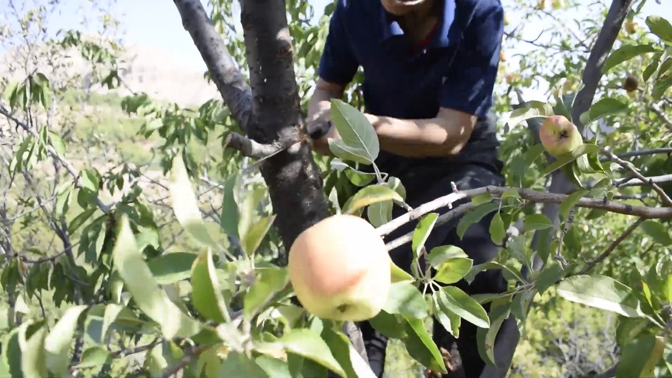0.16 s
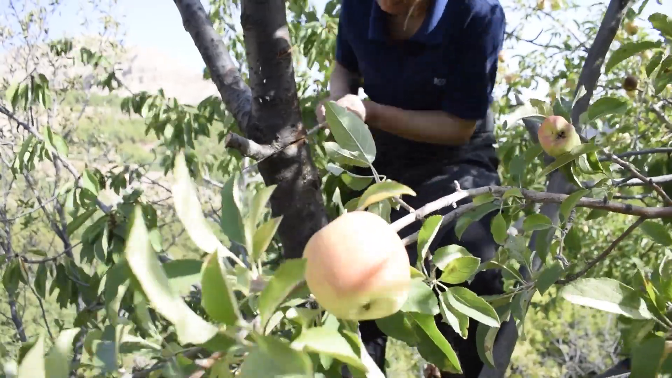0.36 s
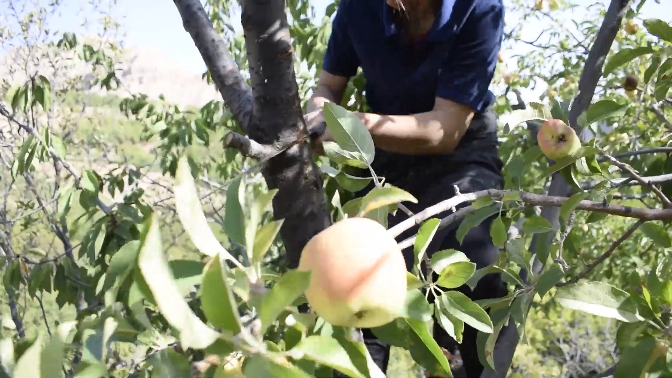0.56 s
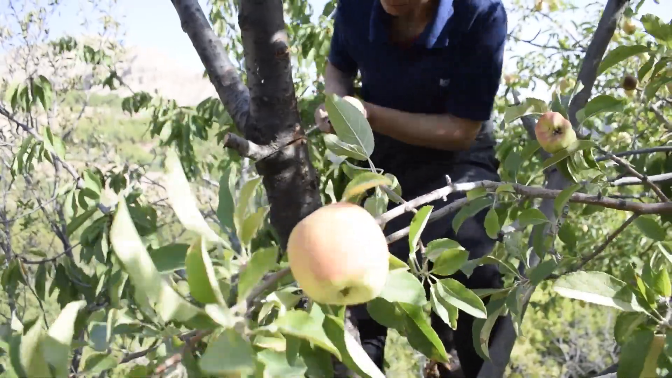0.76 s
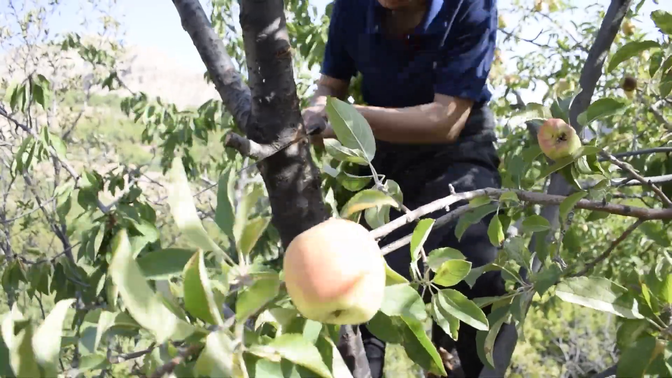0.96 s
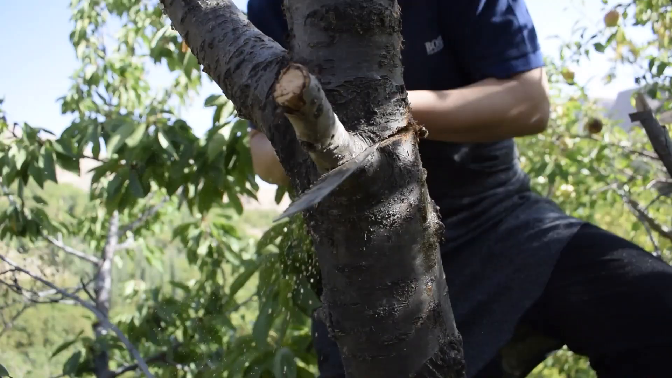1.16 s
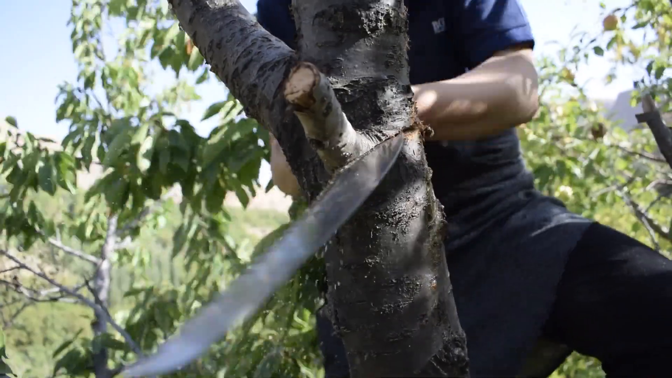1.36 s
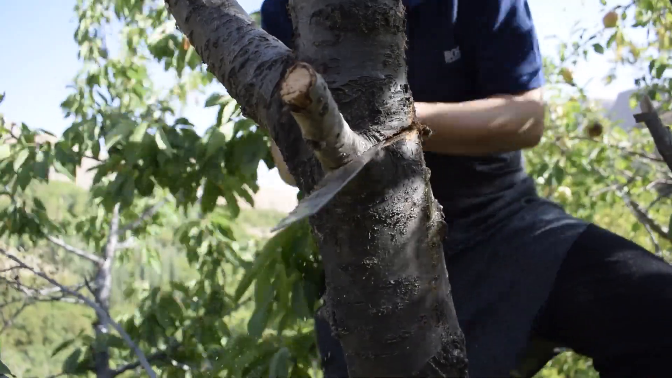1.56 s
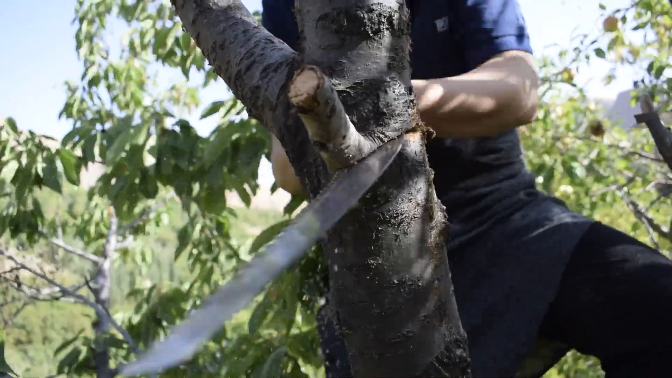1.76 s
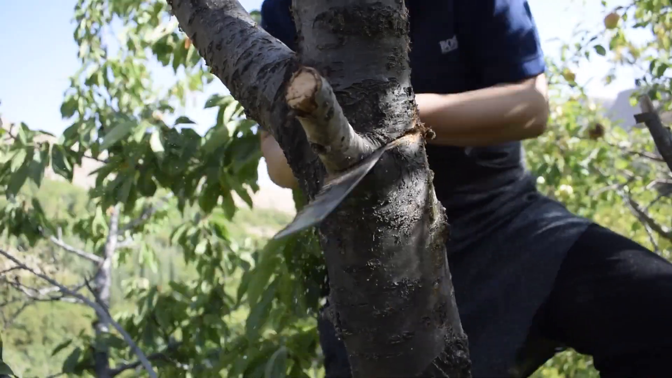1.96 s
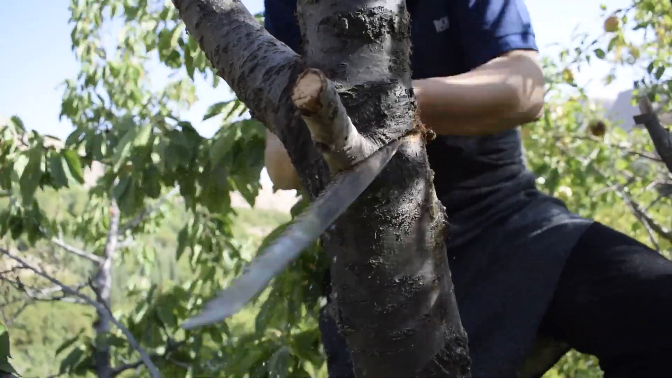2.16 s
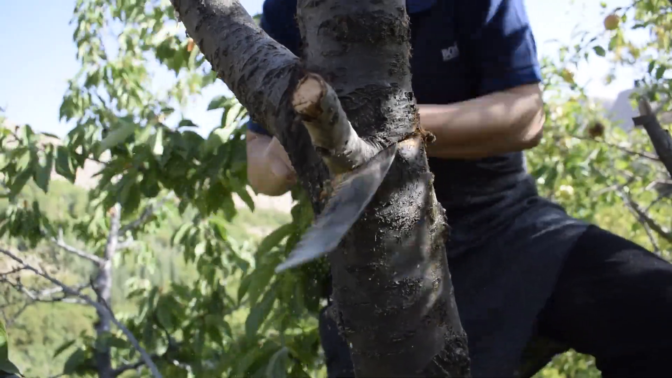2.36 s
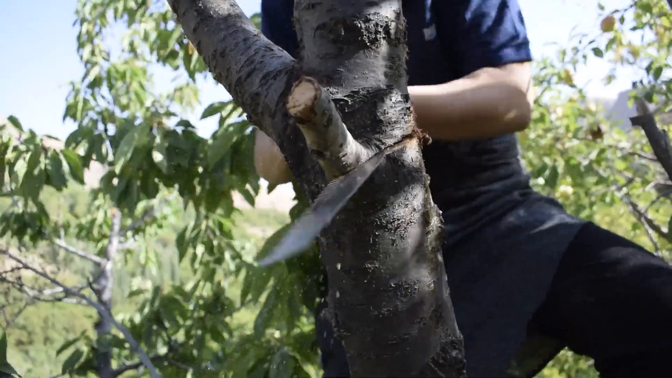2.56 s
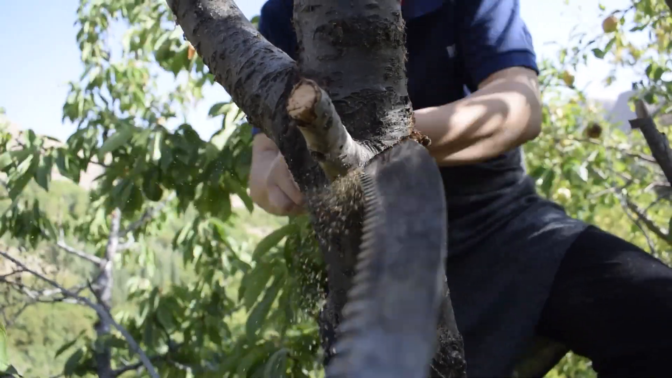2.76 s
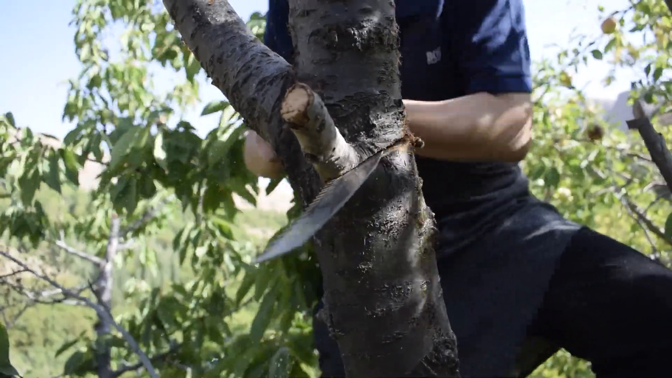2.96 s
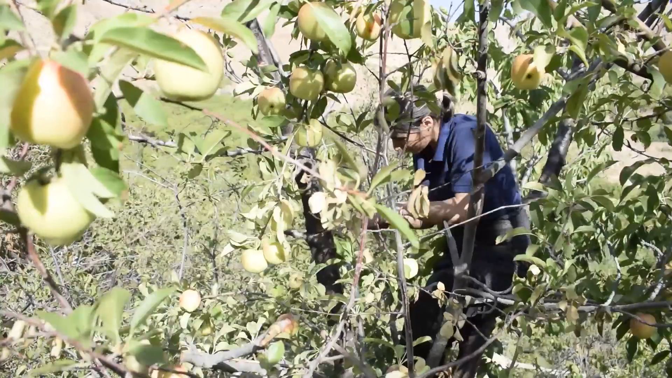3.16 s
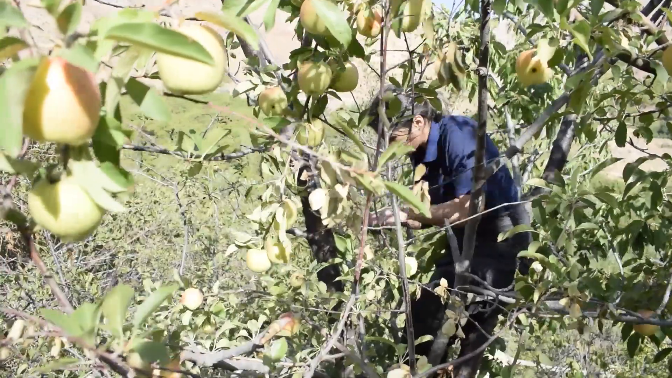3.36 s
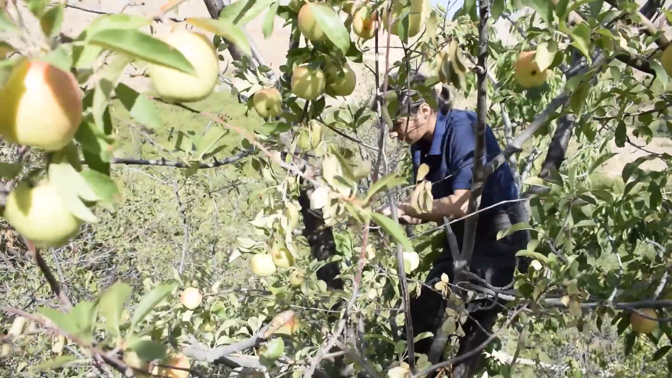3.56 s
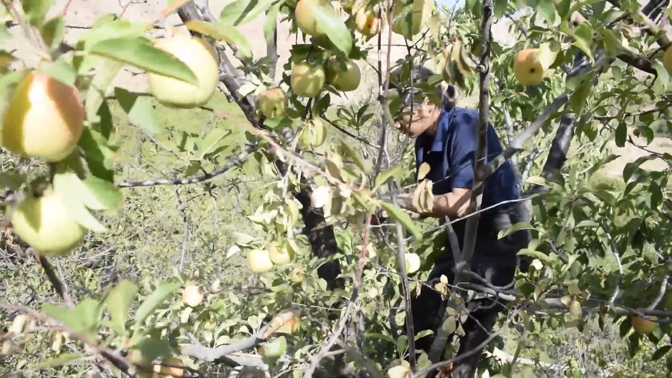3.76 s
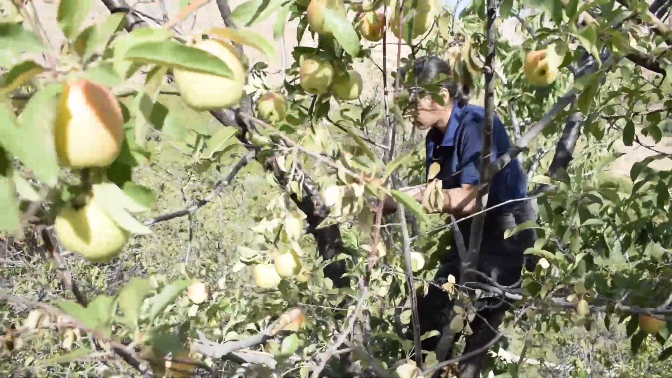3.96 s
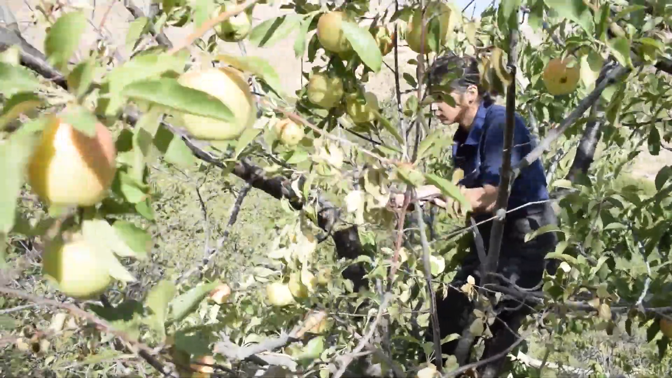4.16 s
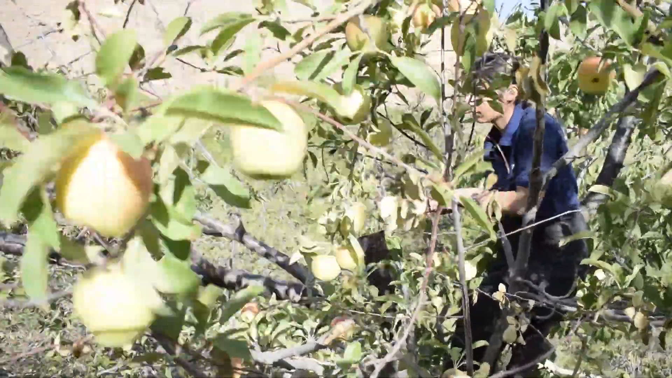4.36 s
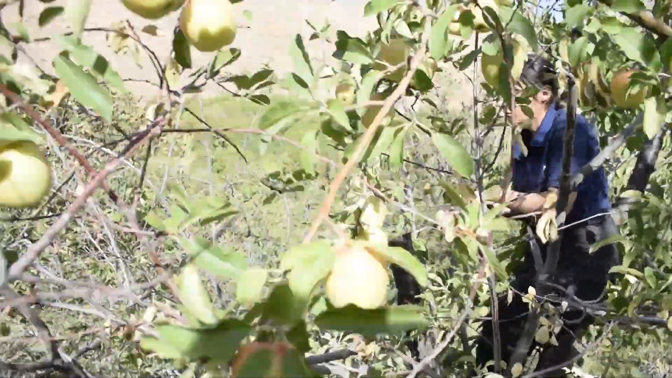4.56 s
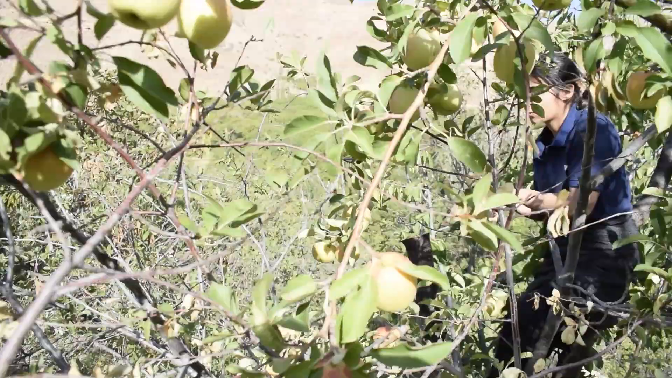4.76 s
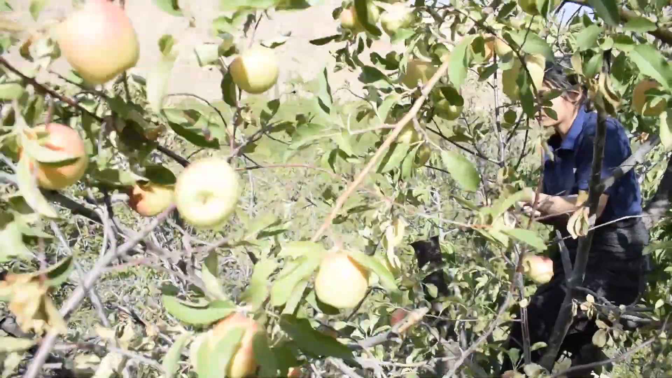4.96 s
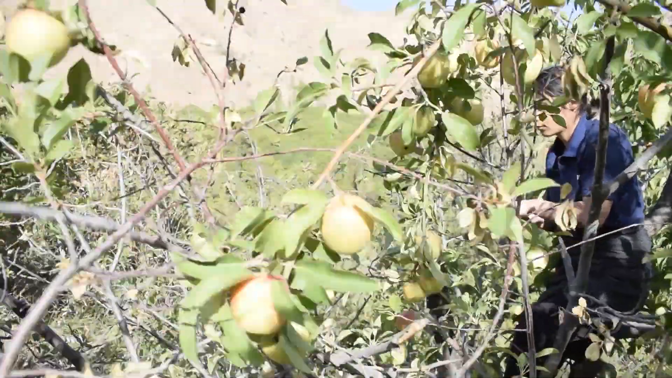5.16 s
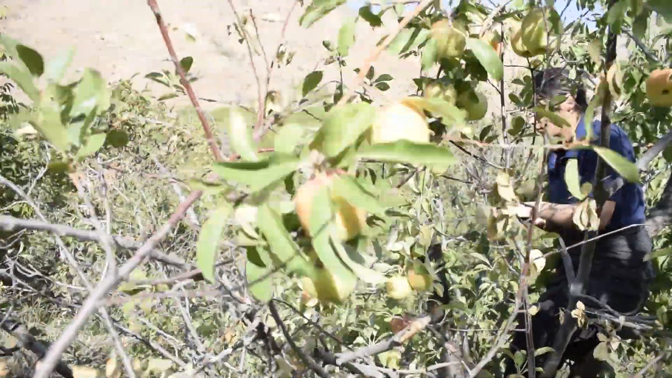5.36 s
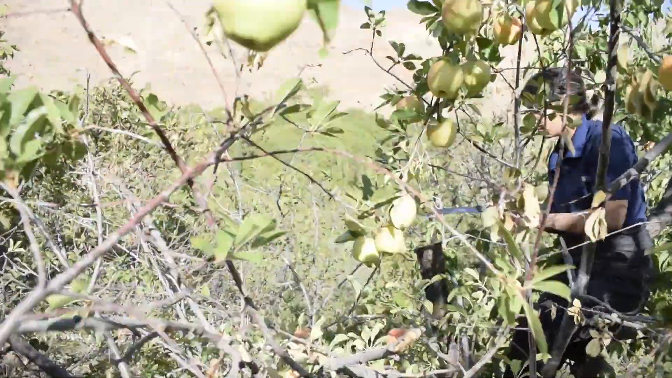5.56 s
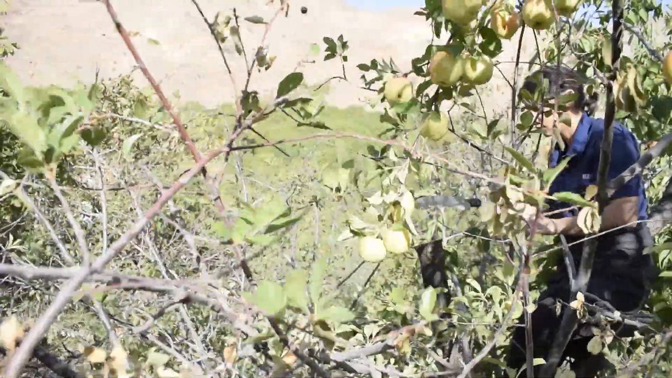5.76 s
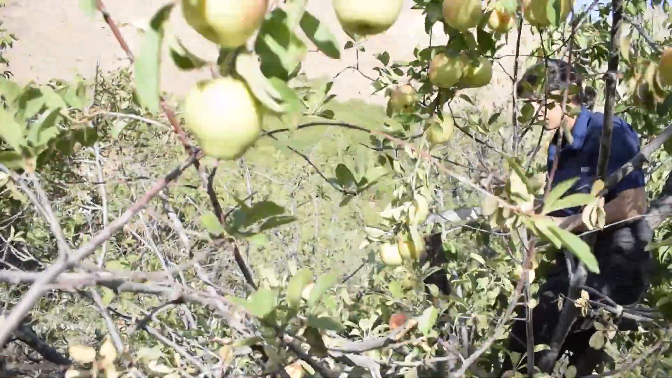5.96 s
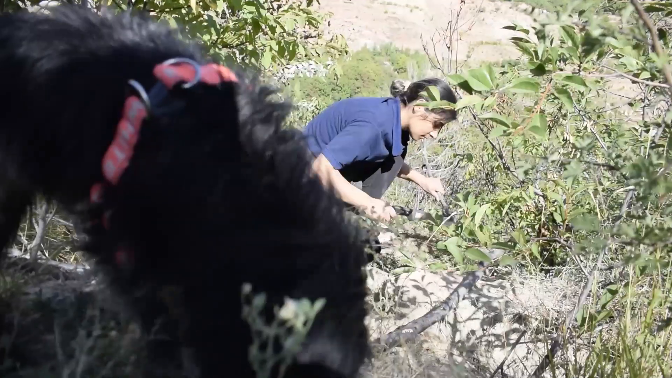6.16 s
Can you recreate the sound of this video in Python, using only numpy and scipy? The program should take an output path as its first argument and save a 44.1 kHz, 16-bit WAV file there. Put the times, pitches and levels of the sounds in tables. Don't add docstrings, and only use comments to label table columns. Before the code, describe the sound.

Rapid bright sawing on wood outdoors grows louder, ends in sharp snaps, and the cut branch falls through foliage and settles.

```python
import sys
import numpy as np
from scipy import signal
from scipy.fft import rfft, irfft
from scipy.io import wavfile
from scipy.ndimage import uniform_filter1d

SR = 44100
rng = np.random.default_rng(int(sys.argv[2]) if len(sys.argv) > 2 else 0)


def output_pcm(signal):
    pcm = np.clip(np.atleast_2d(signal).T, -1, 1) * 32767
    wavfile.write(sys.argv[1], SR, np.round(pcm).astype(np.int16))


def amplitude_ratio(level_db):
    exponent = np.asarray(level_db, float) / 20
    return 10 ** exponent


N = 273420

# start_s, length_s, peak_db,
# entry_db (bite at entry, relative to peak), body_db (wood relative to rasp)
DEEP_PULLS = [
    (1.409, .157, -11.5, -7, -17),
    (1.782, .172, -12, -3.5, -18),
    (2.162, .187, -13.5, -5, -22),
    (2.518, .16, -11.5, -2, -21),
    (2.856, .158, -13.5, -8, -20),
    (3.18, .143, -20.5, -6, -10),
]
# from_s, hush_db, engine_db
PLACINGS = [
    (0, -49, -90),
    (1.15, -42, -41),
    (3.17, -46, -48.5),
]


def evened(x):
    return x / np.sqrt(np.mean(x ** 2) + 1e-20)


def peaked(x):
    return x / np.abs(x).max()


def along(rows):
    s, *columns = np.transpose(rows)
    return [np.interp(np.arange(N) / SR, s, c) for c in columns]


def colour(x, points):
    f, db = np.transpose(points)
    hz = np.fft.rfftfreq(len(x), 1 / SR)
    gain_db = np.interp(np.log(hz + 1), np.log(f + 1), db)
    return irfft(rfft(x) * amplitude_ratio(gain_db), len(x))


def resonate(x, hz, width):
    turn = np.exp(2j * np.pi * np.cumsum(hz * np.ones(len(x))) / SR)
    r = np.exp(-np.pi * width / SR)
    return 2 * (turn * signal.lfilter([1 - r], [1, -r], x / turn)).real


def band(drive, hz):
    rung = resonate(resonate(drive, hz, .36 * hz), hz, .65 * hz)
    return peaked(colour(rung, [(.3 * hz, -40), (.6 * hz, 0)]))


def drift(seconds):
    size = max(int(seconds * SR), 2)
    smooth = uniform_filter1d(rng.standard_normal(N), size)
    return evened(uniform_filter1d(smooth, size))


def patchy(x, patchy_db, bins, frames):
    z = signal.stft(x, nperseg=256)[2]
    field = uniform_filter1d(rng.standard_normal(z.shape), int(bins), 0)
    field = uniform_filter1d(field, int(frames), 1)
    return evened(signal.istft(z * amplitude_ratio(patchy_db * evened(field)), nperseg=256)[1][:N])


def crackle(per_s, spread_db, ring_s, bed):
    size = amplitude_ratio(spread_db * np.minimum(rng.exponential(1, N), 3)) * (rng.random(N) < per_s / SR)
    bursts = evened(signal.lfilter([1], [1, -np.exp(-1 / (ring_s * SR))], size))
    return evened((bed + bursts) * rng.standard_normal(N))


def add(mix, s, sound):
    part = mix[round(s * SR):][:len(sound)]
    part += sound[:len(part)]


def placed(column):
    rows = np.array(PLACINGS)
    return amplitude_ratio(rows[np.searchsorted(rows[1:, 0], np.arange(N) / SR), column])


def drone():
    # pitch_hz, width_hz, level_db, end_s
    hz, width, db, end = (65, 12, -59, 1.15)
    return amplitude_ratio(db) * evened(resonate(rng.standard_normal(N), hz, width)) * (np.arange(N) < end * SR)


def hush():
    # pitch_hz, level_db
    air_colour = [(20, -25), (60, 4), (110, -7), (300, 7.5), (1700, 0.5), (2900, 0), (5800, 1.5),
                  (8900, -20), (10800, -41), (15600, -20), (16000, -45)]
    air = patchy(colour(rng.standard_normal(N), air_colour), patchy_db=2.2, bins=12, frames=11)
    wind = evened(colour(rng.standard_normal(N), [(15, 7), (50, -7), (100, -20), (200, -50)]))
    wind_db = -19.5 + 1.0 * drift(.04) - 7.0 * (np.arange(N) > 4.05 * SR)
    return placed(column=1) * (air + wind * amplitude_ratio(wind_db))


def engine():
    # time_s, firings_so_far
    firings = [(1.128, 0), (3.401, 48), (4.004, 61), (4.242, 66), (4.913, 80), (5.856, 100), (6.247, 108)]
    # pitch_hz, level_db, t60_s (time to die away)
    pipe_notes = [(147.6, 4, .065), (287, 8, .026), (447, 6, .017)]
    turns = along(firings)[0] - .065
    pops = np.gradient(np.floor(turns)) + 0.3 * np.gradient(np.floor(turns + 0.52))
    pops = pops * amplitude_ratio(1.3 * drift(.02))
    t = np.arange(5000) / SR
    pipe = sum(amplitude_ratio(db - 60 * t / t60) * np.sin(2 * np.pi * hz * t) for hz, db, t60 in pipe_notes)
    pipe = pipe * np.minimum(t / 0.0016, 1)
    putter = colour(signal.oaconvolve(pops, pipe)[:N], [(70, -8), (120, -6.5), (520, 3.0), (800, -57)])
    return placed(column=2) * evened(putter)


def ducking(near):
    from_db, share, recover_db_per_s = -24.7, 1.5, 37
    power_db = 10 * np.log10(abs(uniform_filter1d(near ** 2, size=2500)) + 1e-12)
    fall_db = np.arange(N) * recover_db_per_s / SR
    held_db = np.maximum.accumulate(power_db + fall_db) - fall_db
    return amplitude_ratio(-share * np.maximum(held_db - from_db, 0))


def outdoor_echoes(near):
    t = np.arange(6000) / SR
    echoes = rng.standard_normal(6000) * (t > .003) * amplitude_ratio(-60 * t / 0.069)
    return amplitude_ratio(-16) * signal.oaconvolve(near, echoes / np.linalg.norm(echoes))[:N]


def knock(db, hz, t60):
    t = np.arange(6000) / SR
    note = np.sin(2 * np.pi * hz * t) + 0.23 * np.sin(2 * np.pi * 1.5 * hz * t)
    return amplitude_ratio(db - 60 * t / t60) * np.minimum(t * hz, 1) * note


def add_knocks(near):
    # start_s, peak_db, pitch_hz, t60_s
    blows = [(1.795, -33, 45, .1), (2.087, -8.5, 310, 0.02), (2.48, -36, 50, .1), (3.93, -26, 660, .045),
             (3.643, -28, 560, .03), (2.08, -27, 60, 0.07), (2.2, -35, 125, 0.09), (2.464, -22, 447, 0.016),
             (2.872, -28.5, 198, 0.15), (2.872, -27, 620, .04), (4.148, -18, 650, 0.049),
             (4.149, -27, 277, 0.061), (4.32, -24, 786, 0.081), (4.54, -13, 1645, 0.028),
             (4.852, -17.5, 1400, .04), (5.049, -31, 248, 0.097), (5.475, -24, 437, 0.043),
             (5.478, -27, 240, 0.05)]
    for s, *how in blows:
        add(near, s, knock(*how))


def brushing():
    # start_s, hold_s, leaf_db, twig_db, limb_db
    brushes = [(3.375, .03, -36, -39, -37), (3.434, 0.015, -28, -41, -42), (3.655, 0.004, -35.5, -39, -41),
               (3.792, .025, -32, -40, -43), (3.829, .035, -34, -31, -36), (3.934, .04, -37, -35, -34),
               (4.06, .03, -36.5, -38.5, -46), (4.13, 0.033, -28.5, -31, -37),
               (4.206, 0.068, -25, -34, -42), (4.302, .08, -20, -29, -31), (4.379, 0.091, -20, -29, -39),
               (4.538, 0.025, -26, -30.5, -45), (4.651, 0.064, -26, -34, -42),
               (4.799, 0.08, -24, -31, -39.5), (4.98, .04, -20.5, -30.5, -39),
               (5.029, .04, -20, -24, -31.5), (5.12, .07, -21, -34, -42), (5.21, .12, -18.5, -36, -48),
               (5.37, .02, -27.5, -41.5, -54), (5.415, .04, -34, -44, -54), (5.47, 0.017, -32, -38, -45.5),
               (5.61, .04, -38, -50, -52), (6.015, .015, -42, -52, -58)]
    rise_db_per_s, fade_db_per_s = 596, 224
    stir_s, landed_s, settle_db_per_s = 4.05, 5.27, 15
    t = np.arange(N) / SR
    stir_db = np.where(t > DEEP_PULLS[-1][0], -13 * (t < stir_s), -90)
    stir_db = stir_db - settle_db_per_s * np.maximum(t - landed_s, 0)
    power = amplitude_ratio(2 * (stir_db + np.array([[-37], [-45.5], [-50]])))
    for s, hold, *dbs in brushes:
        shape_db = -rise_db_per_s * np.maximum(s - t, 0) - fade_db_per_s * np.maximum(t - s - hold, 0)
        power = power + amplitude_ratio(2 * shape_db) * amplitude_ratio(2 * np.array(dbs))[:, None]
    return np.sqrt(power)


def fall():
    # pitch_hz, level_db
    leaf_colour = [(2800, -40), (4000, -3), (7800, -4), (8800, -0.5), (11000, -6), (14000, -2.5),
                   (15600, -2.5), (16000, -42)]
    # time_s, pitch_hz
    leaf_hz = [(3.43, 5400), (3.46, 8000), (3.7, 7300), (3.86, 4250), (4.22, 8200), (4.28, 5400),
               (4.47, 5770), (4.51, 7740), (4.7, 5950), (4.98, 7800)]
    twig_colour = [(1200, -97), (1800, -3.5), (4000, -2), (5000, -43)]
    limb_colour = [(250, -40), (400, -18), (650, -10.5), (1100, -6), (1700, -6), (2200, -101)]
    leaf, twig, limb = brushing()
    clumps = amplitude_ratio(1.2 * drift(.008))
    fizz = crackle(per_s=2000, spread_db=4.2, ring_s=0.0003, bed=1.1) * clumps
    rub = crackle(per_s=900, spread_db=3.0, ring_s=.0015, bed=1.8) * clumps
    leaves = evened(colour(fizz, leaf_colour))
    leaves = leaves + 9.2 * resonate(leaves, along(leaf_hz)[0], 2700)
    leaves = patchy(leaves, patchy_db=2.3, bins=37, frames=2.3)
    twigs = patchy(colour(rub, twig_colour), patchy_db=2.7, bins=2.6, frames=6.1)
    limbs = patchy(colour(rub, limb_colour), patchy_db=2.5, bins=3.2, frames=8)
    return leaf * leaves + twig * twigs + limb * limbs


def flick(db, hz, t60):
    t = np.arange(2500) / SR
    drive = rng.standard_normal(2500) * (np.exp(-t / .0008) + .35 * amplitude_ratio(-60 * t / t60))
    return amplitude_ratio(db) * band(drive, hz) * np.minimum(t / .0002, 1)


def add_leaf_flicks(near):
    # start_s, peak_db, pitch_hz, t60_s
    flicks = [(3.7806, -22, 8700, 0.03), (3.7972, -16, 5500, 0.03), (4.0101, -22, 4200, 0.03),
              (4.0594, -18, 3100, 0.03), (4.1064, -17, 7500, 0.03), (4.1288, -14, 7700, 0.03),
              (4.2442, -10, 9500, 0.03), (4.3059, -10, 5000, 0.03), (4.3363, -6, 7100, 0.03),
              (4.3915, -7, 5500, 0.03), (4.3798, -3, 6100, 0.03), (4.4546, -2, 6200, 0.03),
              (4.4651, 0, 6300, 0.03), (4.5032, 2, 7000, 0.03), (4.5283, -3, 8400, 0.03),
              (4.5532, -6, 6200, 0.03), (4.5863, -12, 9000, 0.03), (4.6305, -12, 5500, 0.03),
              (4.7867, -12, 9000, 0.03), (4.8667, -14, 5300, 0.03), (4.9489, -17, 3200, 0.03),
              (4.9632, -9, 8700, 0.03), (4.9873, -8, 8800, 0.03), (5.0115, -5, 8900, 0.03),
              (5.0243, -3, 7800, 0.03), (5.0367, -5, 8200, 0.03), (5.0579, -7, 6700, 0.03),
              (5.1127, -11, 9000, 0.03), (5.125, -5, 12500, 0.03), (5.1713, -9, 8400, 0.03),
              (5.2055, -4, 8800, 0.03), (5.2119, -5, 8800, 0.03), (5.2229, -2, 8800, 0.03),
              (5.2621, -4, 7600, 0.03), (5.2686, -4, 8000, 0.03), (5.2824, -2, 6900, 0.03),
              (5.2914, -6, 8700, 0.03), (5.3049, -4, 8500, 0.03), (5.3271, -4, 8000, 0.03),
              (5.3544, -10, 9900, 0.03), (5.3782, -12, 8300, 0.03), (5.3938, -13, 8700, 0.03),
              (5.4919, -13, 9700, 0.03)]
    for s, db, hz, t60 in flicks:
        add(near, s, flick(db - 1.5, hz, t60))


def snap(db, hz, woody_db, top_db, wide_db):
    t = np.arange(3000) / SR
    at, size = rng.random((2, 4))
    at = 0.0065 * at * (np.arange(4) > 0)
    noise = rng.standard_normal(3000)
    ticks = sum(np.where(s > 0, .25 * a, 1) * (t >= s) * np.exp(-np.abs(t - s) / 0.0008)
                for s, a in zip(at, size))
    drive = noise * (ticks + 0.11 * np.exp(-t / 0.013)) + 1.6 * (t == 0)
    main = 0.82 * band(drive, hz)
    crisp = peaked(colour(drive, [(300, -70), (2000, -40), (3200, -2), (9000, 2), (11000, -33)]))
    top = peaked(colour(drive, [(5000, -60), (8000, -24), (11000, -6)]))
    modes = (1050, 1700, 2250, 2900)
    woody = peaked(sum(resonate(resonate(drive, mode_hz, 660), mode_hz, 980) for mode_hz in modes))
    woody = colour(woody, [(400, -40), (850, 0)])
    fade = np.clip(2 - 2 * t / t[-1], 0, 1) ** 2
    parts = main + amplitude_ratio(wide_db) * crisp + 2.0 * amplitude_ratio(top_db) * top + 0.92 * amplitude_ratio(woody_db) * woody
    return fade * amplitude_ratio(db) * parts


def add_breaks(near):
    # start_s, peak_db, ring_hz, woody_db, top_db (last two relative to peak)
    cracks = [(3.3594, -9, 8300, -1, -17), (3.486, -11, 3750, -16, -17), (3.486, -10, 8300, -30, -20),
              (3.4926, -2, 8200, -6, -16), (3.6441, -5, 8500, -4, -9), (3.6455, -11, 4500, -20, -30),
              (3.929, -11, 2950, -7, -42), (4.149, -5, 3840, -7, -12), (4.3287, -4, 5400, -11, -29),
              (4.3867, -3, 5100, -20, -32), (4.5399, -1, 6260, -5, -22), (4.6781, -3, 3600, -7, -14),
              (5.3374, -4, 8450, -17, -17), (5.578, -19, 9100, -16, -20), (5.742, -13, 7400, -15, -25),
              (5.336, -19, 2200, -8, -30), (5.875, -30, 1600, -6, -30)]
    chips = [
        (0.445, -32, 902, 7, -18),
        (1.1977, -24, 2800, 6, -50),
        (2.8291, -22, 2100, 3, -28),
        (2.9984, -12, 8000, -34, -12),
    ]
    # start_s, peak_db, ring_hz, top_db
    light_snaps = [(3.3622, -8, 8000, -14), (3.4412, -6, 5000, -34), (3.4415, -11, 8000, -30),
                   (3.6508, -13, 8500, -16), (4.233, -9, 7000, -20), (4.5435, -4, 7500, -25),
                   (3.8607, -13, 4230, -37), (4.198, -5, 8700, -5), (4.218, -9.5, 8500, -11),
                   (4.228, -8.5, 5900, -14), (4.288, -8, 5340, -29), (4.3168, -6, 5830, -27),
                   (4.4585, -2, 6000, -30), (4.47, 0, 6050, -20), (4.5007, -1, 8700, -27),
                   (4.5662, -7, 6140, -28), (4.644, -4.5, 7240, -11), (4.7075, -8.5, 2800, -25),
                   (4.735, -14, 2700, -30), (4.796, -6, 8500, -20), (4.822, -6, 10300, -8),
                   (4.831, -3, 6000, -12), (4.8524, -4.5, 6300, -12), (4.9, -11, 5000, -25),
                   (4.9911, -15, 8440, -18), (5.043, -5, 4500, -25), (5.6265, -17, 7000, -20)]
    # start_s, peak_db, pitch_hz, t60_s
    bodies = [(3.3615, -12, 1700, .07), (3.4935, -10, 1550, .035), (3.4935, -12, 2400, .04),
              (3.6455, -9, 1500, .03), (3.9295, -15, 1800, .06), (4.5395, -9, 1500, .04),
              (4.678, -9, 2400, .05), (4.4728, 0, 6000, .035), (4.198, -8, 13000, .02),
              (4.8225, -3, 10000, .02), (2.999, -11, 6200, .1), (5.742, -18, 5200, .05)]
    for s, *how in cracks + chips:
        add(near, s, snap(*how, wide_db=-10))
    for s, db, hz, top_db in light_snaps:
        add(near, s, snap(db, hz, woody_db=-32, top_db=top_db, wide_db=-11))
    for s, *how in bodies:
        add(near, s, flick(*how))


def groan(length, from_hz, to_hz, db, slope_db):
    size = round(length * SR)
    wobble = uniform_filter1d(rng.standard_normal((5, 6000)), 200)[:, :size] * 14
    turns = np.cumsum(np.linspace(from_hz, to_hz, size) * (1 + 0.035 * wobble[4])) / SR
    buzz = sum(amplitude_ratio(slope_db * k + 4.5 * wobble[k]) * np.cos(2 * np.pi * (k + 1) * turns)
               for k in range(3))
    return amplitude_ratio(db) * evened(buzz) * signal.windows.tukey(size, .6)


def add_groans(near):
    # start_s, length_s, from_hz, to_hz, level_db
    groans = [(0, 0.038, 520, 460, -27), (.35, 0.059, 413, 330, -22.5), (.512, .07, 470, 390, -34.5),
              (.67, .038, 560, 490, -37), (.713, .06, 370, 345, -26), (.72, .05, 1060, 1000, -31),
              (1.07, 0.07, 455, 310, -25), (1.46, 0.027, 430, 423, -27), (1.496, 0.04, 345, 243, -27),
              (1.659, .036, 440, 420, -34), (1.867, 0.074, 360, 286, -24.5)]
    creaks = [
        (3.234, 0.0809, 821, 541, -30.5),
        (3.375, .1, 1040, 1104, -35.5),
    ]
    for table, slope_db in ((groans, -1), (creaks, -25)):
        for s, *how in table:
            add(near, s, groan(*how, slope_db))


def add_jams(near):
    # start_s, peak_db, pitch_hz, t60_s
    jams = [(0.3678, -6, 6200, 0.02), (0.3953, -11, 14900, 0.02), (0.6441, -12, 13800, 0.02),
            (1.0839, -2, 7200, 0.02), (1.0971, -2, 6700, 0.02), (1.1245, -1, 9900, 0.02),
            (1.4414, -4, 7300, 0.02), (1.4692, -3, 9300, 0.02), (1.6194, -10, 8300, 0.02),
            (1.6326, -4, 8400, 0.02), (1.8119, -4, 14500, 0.02), (1.8444, -1, 6100, 0.02),
            (1.8751, -3, 8000, 0.02), (1.895, -3, 8600, 0.02),  (2.1985, -4, 8500, 0.02),
            (2.2102, -3, 8500, 0.02), (2.2501, 1, 7400, 0.02), (2.3902, -8, 8800, 0.02),
            (2.5397, -7, 5600, 0.02), (2.7382, -5, 13800, 0.02), (2.8775, -11, 9000, 0.02),
            (2.9066, -6, 13600, 0.02), (3.1049, -6, 8400, 0.02), (3.2338, -2, 8700, 0.02),
            (3.2468, -7, 4400, 0.02), (2.9605, -1, 7500, 0.02)]
    for s, db, hz, t60 in jams:
        add(near, s, flick(db - 4, hz, t60))


def ring(length, hz, width, db):
    size = round(length * SR)
    rough = resonate(resonate(rng.standard_normal(6000), hz, width), hz, 2 * width)
    return amplitude_ratio(db) * evened(rough)[-size:] * signal.windows.tukey(size, .7)


def add_rings(near):
    # start_s, length_s, pitch_hz, width_hz, level_db
    rings = [(0, .03, 1000, 250, -24), (0, .03, 4800, 600, -34), (.02, .03, 8500, 4000, -36),
             (.045, .075, 4400, 40, -47), (.12, .09, 2800, 700, -42), (.28, .08, 3600, 700, -33),
             (.31, .03, 2100, 300, -33), (.335, .03, 3300, 300, -29), (.36, .05, 750, 250, -29),
             (.66, .05, 1030, 150, -32), (.69, .035, 3200, 350, -28), (.72, .05, 780, 250, -28),
             (1.112, .024, 5500, 6000, -19), (1.04, .095, 3300, 500, -26), (1.195, .07, 1900, 1000, -38),
             (1.28, .04, 2100, 400, -30), (1.42, .06, 1400, 300, -31), (1.81, .05, 5400, 900, -24),
             (1.87, .05, 4300, 700, -27), (2.01, .08, 2200, 350, -34), (2.045, .035, 3800, 500, -31),
             (1.3, .022, 7000, 5000, -20), (2.175, .07, 5300, 800, -23), (2.18, .05, 2100, 400, -34),
             (2.38, .09, 2100, 500, -29), (2.53, .05, 4500, 900, -28), (2.73, .07, 3300, 500, -28),
             (2.73, .09, 2000, 300, -32), (2.86, .05, 700, 300, -36), (2.92, .05, 5400, 900, -25),
             (3.09, .06, 3300, 700, -25), (3.19, .07, 2200, 1200, -32), (3.2, .1, 4400, 1200, -30),
             (3.93, .08, 1100, 500, -36), (4.34, .06, 800, 200, -32), (4.42, .05, 2600, 500, -28),
             (4.95, .02, 2050, 200, -30), (4.88, .08, 2200, 1500, -35), (3.96, .08, 5500, 2500, -35),
             (4.22, .05, 1900, 900, -34), (5.16, .03, 2100, 600, -30)]
    for s, *how in rings:
        add(near, s, ring(*how))


def strokes(table, attack, peak_at, release, shoulder_db, entry_wood_db, swell_db,
            blade_db, blade_share, blade_swell_db):
    turn_dbs = (-49, -49, -47)
    rows = []
    for s, length, db, entry_db, body_db in table:
        wood_db, ring_db = db + body_db, db + blade_db + blade_share * body_db
        rows += [
            (s, *turn_dbs),
            (s + attack, db + entry_db, ring_db + entry_db, wood_db + entry_db + entry_wood_db),
            (s + peak_at * length, db, ring_db, wood_db),
            (s + length - release, db + shoulder_db, ring_db + shoulder_db + blade_swell_db,
             wood_db + shoulder_db + swell_db),
            (s + length, *turn_dbs)]
    return rows


def saw():
    pushes = [
        (.114, .105, -24, -8, -15),
        (.484, .1, -22.5, -2.5, -16),
        (.834, .108, -22, -5, -18),
        (1.19, .14, -16, -16, -18),
        (1.59, .119, -12.5, -7, -16),
        (1.985, .12, -12.5, -4.5, -16),
        (2.357, .117, -11.5, -4, -22.5),
        (2.702, .117, -12.5, -4.5, -22),
        (3.067, .098, -15, -6, -17),
    ]
    pulls = [
        (-.118, .17, -27, -8, -2),
        (.263, 0.17, -16.5, -11, -8),
        (.622, .168, -17.5, -5, -11),
        (1.0, .148, -15, -11, -12),
    ]
    # attack_s, peak_at (share of length), release_s, shoulder_db, entry_wood_db,
    # wood_swell_db, blade_db, blade_share (dB per dB of wood), blade_swell_db
    push_rule = (.034, .64, 0.02, -3, 2, 1, -.5, .4, 2)
    pull_rule = (.026, .66, .034, -2.5, -4, 6, -1, .6, 4.5)
    deep_rule = (.022, .5, .048, -4, 0, 5, -1, .8, 4)
    # pitch_hz, level_db
    rasp_colour = [(3000, -98), (4500, -5), (6000, 0.5), (8500, 1.5), (9600, -1), (11000, -8),
                   (13000, -1.5), (15600, -2), (16000, -116)]
    wood_colour = [(150, -10), (300, 2), (700, 3), (1100, 2), (1400, -3), (2000, -43)]
    # time_s, pitch_hz
    rasp_hz = [(0, 8000), (.86, 7100), (1.55, 8500), (2.08, 7440), (2.3, 9200), (3.35, 7160)]
    # pitch_hz, width_hz, level_db
    blade_modes = [(2090, 284, 8.5), (2590, 490, -2), (3420, 600, 7.5)]

    t = np.arange(N) / SR
    rows = strokes(pushes, *push_rule) + strokes(pulls, *pull_rule) + strokes(DEEP_PULLS, *deep_rule)
    rasp_db, blade_db, wood_db = along(sorted(rows))
    blade_db = blade_db + 5 * (np.abs(t - pushes[-1][0] - .05) < .05)

    turns = np.cumsum(380 * (1 + 0.17 * drift(0.034))) / SR
    tearing = crackle(per_s=2900, spread_db=3.6, ring_s=0.0006, bed=1.7)
    tearing = tearing * (2.9 + np.exp(-(turns % 1) / 0.12))
    tearing = tearing * amplitude_ratio(1.68 * drift(0.0044))

    rasp = evened(colour(tearing, rasp_colour))
    rasp = rasp + 0.41 * resonate(rasp, along(rasp_hz)[0], 2200)
    rasp = patchy(rasp, patchy_db=2.4, bins=14, frames=13)

    slide = 1 + .09 * drift(.05)
    blade = sum(amplitude_ratio(db) * resonate(resonate(tearing, hz * slide, width), hz * slide, 2 * width)
                for hz, width, db in blade_modes)
    buzz = evened(colour(tearing, [(1100, -50), (1500, -9), (4500, -1.5), (5500, -22)]))
    blade = patchy(evened(blade) + 2.4 * buzz, patchy_db=2.0, bins=2, frames=11)

    wood = patchy(colour(tearing, wood_colour), patchy_db=4.5, bins=1, frames=12)
    thin = colour(wood, [(350, -15), (600, 0.0)])
    wood = np.where(t > DEEP_PULLS[-1][0], thin, wood)
    sawing = t < sum(DEEP_PULLS[-1][:2])
    return sawing * (amplitude_ratio(rasp_db) * rasp + amplitude_ratio(blade_db) * blade + amplitude_ratio(wood_db) * wood)


def scene():
    near = saw() + fall()
    add_breaks(near)
    add_groans(near)
    add_leaf_flicks(near)
    add_jams(near)
    add_rings(near)
    near = near + outdoor_echoes(near)
    near = colour(near, [(80, -24), (180, -0.5)])
    add_knocks(near)
    return (near + ducking(near) * (engine() + hush()) + drone())[None]


def band_limit(x):
    return signal.sosfilt(signal.butter(12, 16670, fs=SR, output="sos"), x)


def record(dry):
    # pitch_hz, level_db
    treble_edge = [(15700, 0), (16100, -30), (16700, -40), (17000, -90)]
    fade = np.clip((N - np.arange(N)) / (.03 * SR), 0, 1)
    mix = colour(np.clip(dry[0], -1, 1) * fade, treble_edge)[None]
    return band_limit(mix)


dry = scene()
out = record(dry)
output_pcm(out)
```